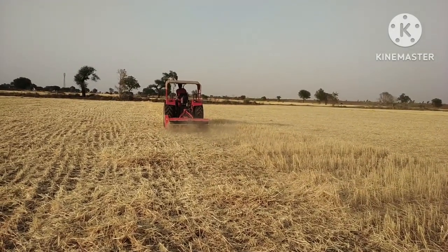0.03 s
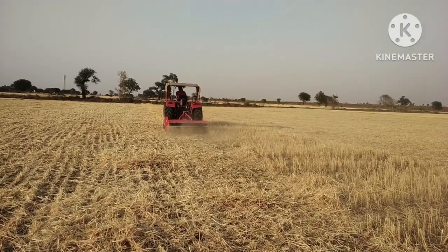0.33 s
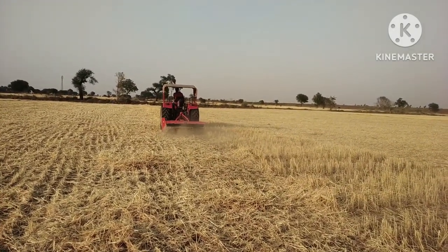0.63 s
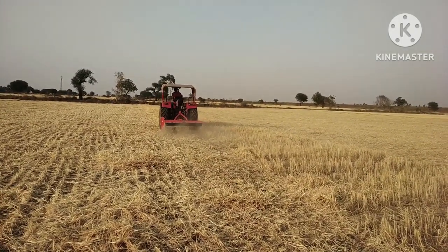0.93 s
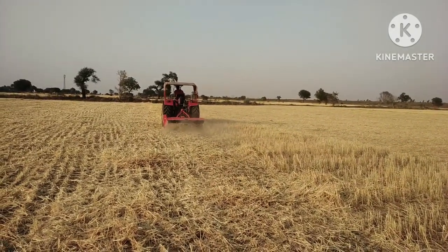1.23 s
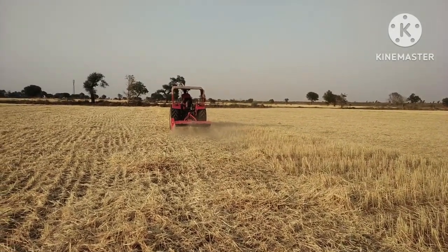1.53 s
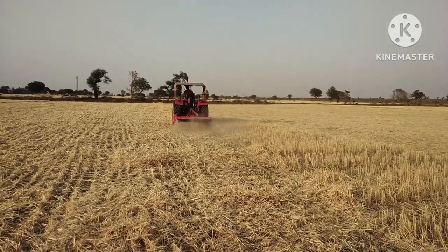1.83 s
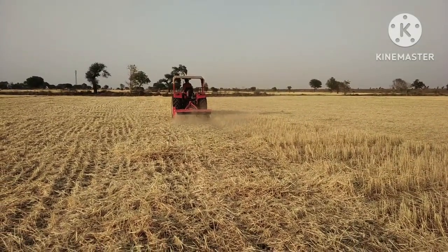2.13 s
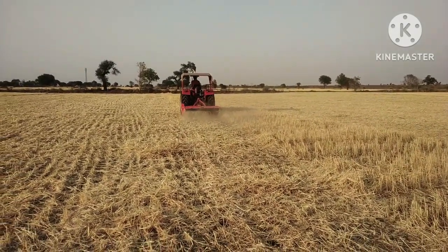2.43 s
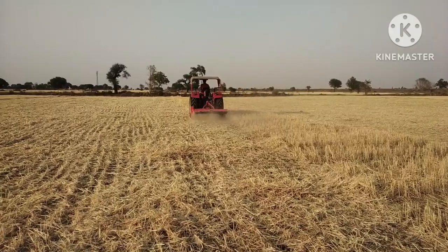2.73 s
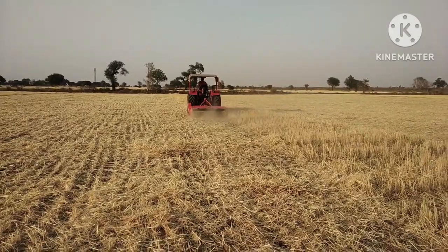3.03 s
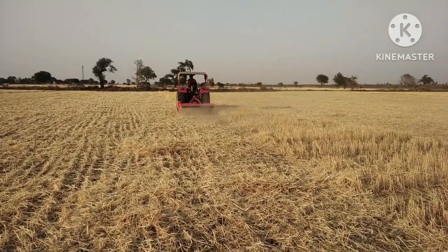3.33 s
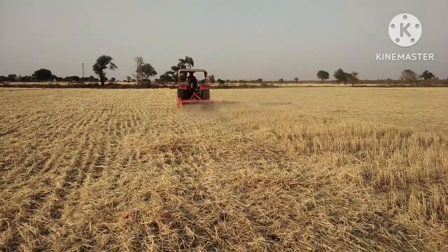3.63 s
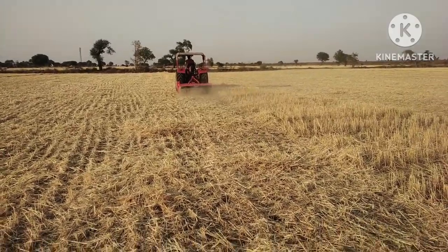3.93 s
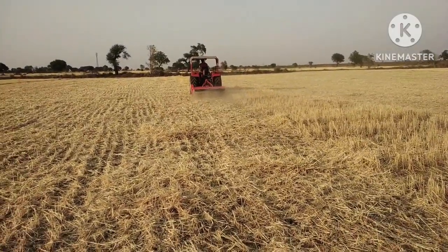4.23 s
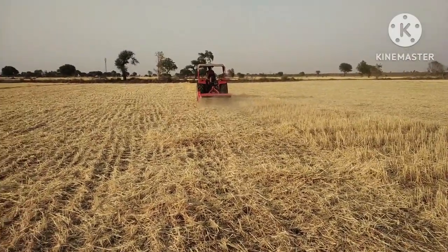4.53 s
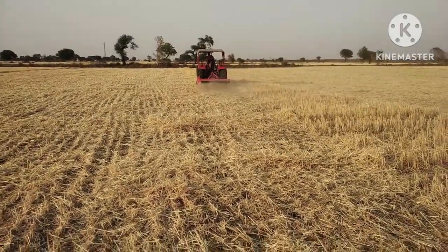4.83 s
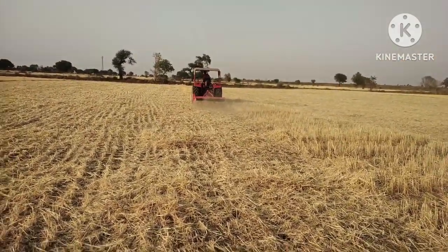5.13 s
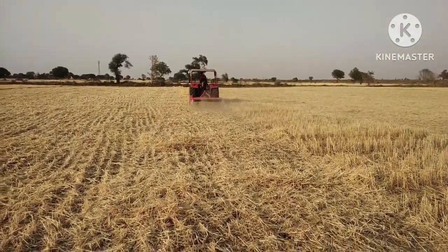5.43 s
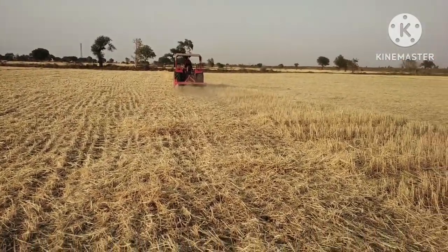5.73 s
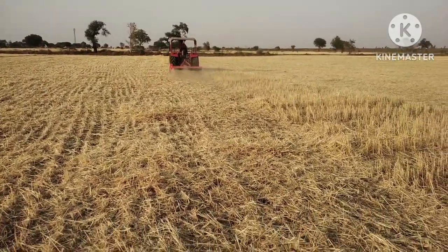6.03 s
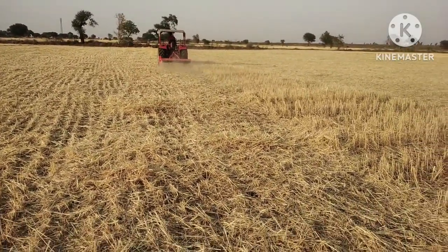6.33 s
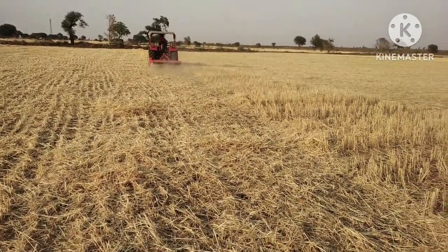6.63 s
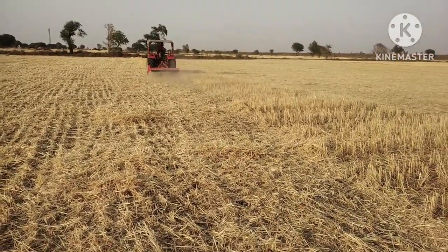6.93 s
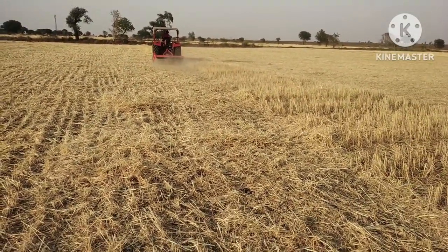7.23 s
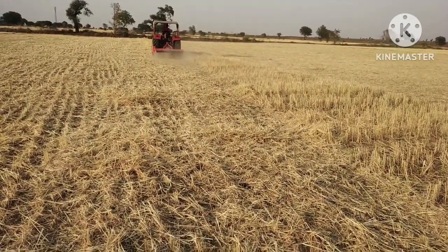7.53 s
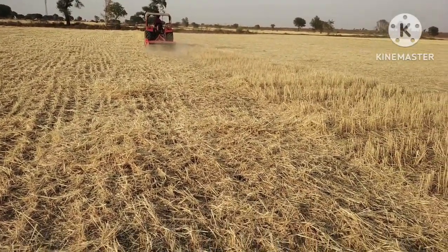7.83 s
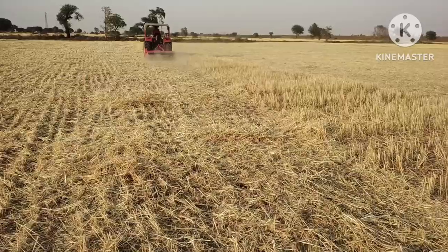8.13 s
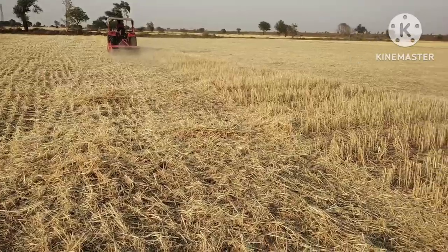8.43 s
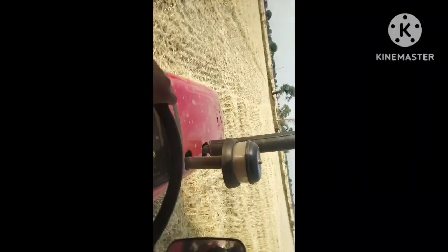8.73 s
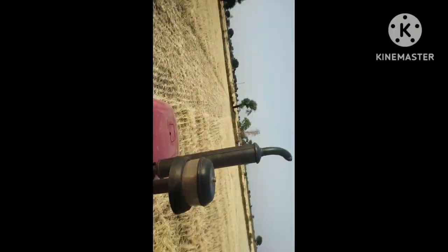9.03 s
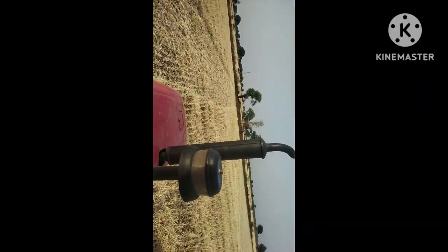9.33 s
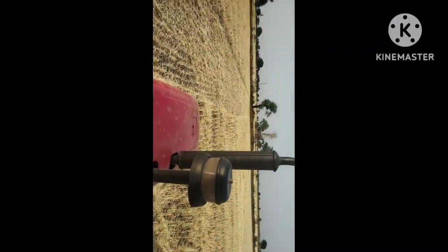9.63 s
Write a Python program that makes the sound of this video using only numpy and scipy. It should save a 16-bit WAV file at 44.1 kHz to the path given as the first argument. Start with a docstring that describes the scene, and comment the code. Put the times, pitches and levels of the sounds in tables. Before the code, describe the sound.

From the start, a diesel tractor pulls a mulcher across an open field, some way off. Flails chop straw in an uneven roar that slowly recedes, over a steady engine rumble and hum. Gears whine in wavering tones that surge now and then. Dry stubble hisses and crackles toward the right, with a thin sizzle of chaff on the left. Stalks snap occasionally, most sharply at 1.8 seconds. Between 4 and 5.3 seconds the machine's tone shifts slightly upward in colour. From about 5.3 to 8.4 seconds, wind bumps and flutters on the microphone, mostly on the left. Everything fades to a brief silence at 8.7 seconds. By 8.9 the sound returns from the driver's seat: a louder, close, low diesel roar with rapid knocking, ringing bonnet panels and thin hiss. The bodywork jolts around 9 seconds and again at 9.7, just before the end.

```python
"""A dry stubble field, where a diesel tractor pulls a mulcher slowly away, some way off.
Flails chop straw into a roar, stubble hisses, chaff sizzles and gears whine, all combed by a ground
echo. Under them the engine rumbles, exhaust and rotor hum, stalks snap and wind bumps the microphone.
The field fades out and the sound comes back from the driver's seat: a close, low diesel roar
with a knock on every firing, ringing bonnet panels and a few jolts."""
import sys
import numpy as np
from scipy import signal
from scipy.fft import rfft, irfft, next_fast_len
from scipy.io import wavfile
from scipy.ndimage import map_coordinates

SR = 44100
rng = np.random.default_rng(int(sys.argv[2]) if len(sys.argv) > 2 else 0)


def generate_wav(sig):
    """Save sig (samples, or channels by samples) to the path in sys.argv[1] as 16-bit PCM at SR."""
    pcm = np.round(np.clip(np.atleast_2d(sig).T, -1, 1) * 32767).astype(np.int16)
    wavfile.write(sys.argv[1], SR, pcm)


N = 431738
TIME = np.arange(N) / SR
FFT_SIZE = next_fast_len(N, True)
SEAT_START_S = 8.75


def gain_of(db):
    """Decibels to gain."""
    return 10 ** (np.asarray(db) / 20)


def unit_rms(x):
    """Scales to rms 1."""
    return x / np.sqrt(np.mean(x ** 2) + 1e-20)


def curve(rows, column=1):
    """One column of a time table as an automation curve, at every sample."""
    rows = np.array(rows, float)
    return np.interp(TIME, rows[:, 0], rows[:, column])


def at_bins(points):
    """A frequency table at every FFT bin."""
    hz, value = np.transpose(points)
    return np.interp(np.log(np.fft.rfftfreq(FFT_SIZE, 1 / SR) + 1), np.log(hz), value)


def equalise(x, eq):
    """Filters by an EQ curve in dB."""
    return irfft(rfft(x, FFT_SIZE) * gain_of(at_bins(eq)), FFT_SIZE)[..., :N]


def drift(rate_hz):
    """Slow random modulation of rms 1, up to about rate_hz."""
    size, hop = 2 ** 13, 64
    hz = np.fft.rfftfreq(size, hop / SR)
    wander = irfft(rfft(rng.standard_normal(size)) / (1 + (hz / rate_hz) ** 2))
    return unit_rms(np.interp(np.arange(N) / hop, np.arange(size), wander))


def pan(pan_db):
    """Left and right gains; pan_db is left minus right."""
    return unit_rms(gain_of(np.array([[pan_db], [-pan_db]]) / 2))


def add(mix, start_s, sound):
    """Drops a short stereo sound into the mix."""
    part = mix[:, max(round(start_s * SR), 0):][:, :sound.shape[1]]
    part += sound[:, :part.shape[1]]


def delayed(x, lag_ms):
    """A delay line whose lag follows a curve."""
    return map_coordinates(x, [(TIME - lag_ms / 1000) * SR], order=3, mode="nearest")


# How alike left and right are: freq_hz, field_correlation, seat_correlation
STEREO_IMAGE = [(60, 0.18, 0.89), (300, 0.94, 0.94), (800, 0.89, 0.58), (1600, 0.25, 0.04),
                (4200, 0.99, 0.064), (6300, 0.15, 0.02)]
FIELD, SEAT = 1, 2  # the column for each listening spot
def mic_pair(noises, spot):
    """Blends two unrelated noises into a stereo pair whose width varies with frequency."""
    mid, side = rfft(noises, FFT_SIZE)
    correlation = np.clip(at_bins([(row[0], row[spot]) for row in STEREO_IMAGE]), -.99, .99)
    mid, side = mid * np.sqrt(1 + correlation), side * np.sqrt(1 - correlation)
    return irfft(np.array([mid + side, mid - side]), FFT_SIZE)[:, :N]


def distance_gain(start_m=7.06, speed_m_per_s=1.0):
    """The level falls as the tractor drives steadily away."""
    return start_m / (start_m + speed_m_per_s * TIME)


# Engine speed, at two crank turns and four firings a cycle: time_s, cycle_hz
ENGINE_SPEED = [(0, 12.39), (8.7, 12.39), (8.8, 12.94), (9.79, 12.94)]
def engine_cycles():
    """The running count of engine cycles, with a slight waver in speed."""
    return np.cumsum(curve(ENGINE_SPEED) * (1 + 0.001504 * drift(1.533))) / SR


def clatter(cycles, loop_share, throb, spot=FIELD):
    """A rattle loops every engine cycle amid fresh noise, swelling with each firing and crank turn."""
    size = round(SR / ENGINE_SPEED[0][1])
    one_cycle = rng.standard_normal((2, size))
    loop = np.array([np.interp(cycles % 1 * size, np.arange(size), side) for side in one_cycle])
    fresh = rng.standard_normal((2, N))
    rattle = np.sqrt(loop_share) * unit_rms(loop) + np.sqrt(1 - loop_share) * fresh
    pulse = np.cos(8 * np.pi * cycles) + np.cos(4 * np.pi * cycles) / 2
    return mic_pair(rattle * (1 + throb * pulse), spot)


# Exhaust partials, then rotor partials: cycle_multiple, field_level_db, seat_level_db
EXHAUST_PARTIALS = [(8.07, -59, -39), (12.12, -52.5, -29.5), (14.92, -53, -54), (20.4, -51.5, -32),
                    (23.65, -77, -33.5), (23.77, -53, -49), (26.4, -55, -45), (29.88, -57.5, -32.5),
                    (32.7, -59, -35.5), (37.77, -58, -37), (45.9, -55, -34.5), (48.8, -55, -54),
                    (61.1, -67, -36), (64.7, -56.5, -58)]
ROTOR_PARTIALS = [(8.91, -57, -50), (17.81, -42, -27.5)]
def exhaust_and_rotor_hum(cycles, spot, waver_db=1.0, smear_rad=0):
    """Wavering tones locked to the engine; rough running smears the higher ones."""
    hum = np.zeros(N)
    for partial in EXHAUST_PARTIALS + ROTOR_PARTIALS:
        multiple = partial[0]
        level = gain_of(partial[spot] + waver_db * drift(2.5))
        phase = 2 * np.pi * (multiple * cycles + rng.random())
        hum += level * np.sqrt(2) * np.sin(phase + smear_rad * multiple ** 2 * drift(9))
    return hum


# The engine's low end across the field: freq_hz, gain_db
RUMBLE_EQ = [(25, -46), (55, -26), (85, -16.5), (120, -8.5), (160, -0.5), (210, 8.5), (270, 1),
             (380, -14.5), (700, -19), (2000, -52)]
def engine_rumble(cycles, level_db=-39):
    """The low rumble carries over the field, falling off more gently than the chopping."""
    body = unit_rms(equalise(clatter(cycles, loop_share=0.18, throb=0.21), RUMBLE_EQ))
    return pan(-.3) * body * gain_of(level_db + 1.46 * drift(5.9)) * distance_gain() ** 0.14


def flail_tremolo(cycles, depth):
    """Four rows of flails sweep the straw in each rotor turn, one harder than the rest."""
    sweep = 2 * np.pi * ROTOR_PARTIALS[0][0] * cycles
    return 1 + depth * (np.cos(sweep) + np.cos(sweep / 4))


# Level ride as thick and thin straw goes through the flails; the level also dips briefly and deeply at 5.32 s:
# time_s, level_db
STRAW_FEED = [(0.0, -37.5), (0.14, -40), (0.38, -35), (0.73, -37.5), (1.87, -34), (1.96, -37), (2.32, -34),
              (2.39, -38.5), (2.79, -39.5), (2.84, -36), (3.29, -41), (3.6, -37), (3.91, -40), (4.43, -38),
              (4.45, -40.5), (4.85, -35), (5.09, -40.5), (5.28, -38), (5.32, -47.5), (5.51, -36),
              (6.08, -41), (7.6, -43.5), (7.65, -39), (8.1, -45), (8.21, -40.5), (8.5, -38)]
# The bright tone of dry stubble: freq_hz, gain_db
STRAW_EQ = [(1000, -15.5), (3500, -2.5), (5200, 4), (6200, 2.5), (7400, 1), (9000, 1), (12000, 2),
            (15500, 2.5)]
def straw_hiss(cycles, grain=0.22, crackles_per_s=250, decay_s=0.0057, trim_db=5.0):
    """Dry stubble hisses and crackles under the flails, mostly on the right."""
    ticks = (rng.random((2, N)) < crackles_per_s / SR) * rng.standard_normal((2, N))
    ticks *= gain_of(7.3 * np.minimum(rng.exponential(1, (2, N)), 4))  # a few stand far out
    crackle = signal.lfilter([1], [1, -np.exp(-1 / (decay_s * SR))], abs(ticks))
    hiss = mic_pair(rng.standard_normal((2, N)), FIELD) * (1 + grain * unit_rms(crackle))
    hiss = unit_rms(equalise(hiss * flail_tremolo(cycles, depth=0.011), STRAW_EQ))
    return pan(-9.5) * hiss * gain_of(curve(STRAW_FEED) + trim_db + drift(14))


# The chopping roar's tone, and the EQ added by the far end of the run: freq_hz, gain_db
CHOP_EQ = [(40, -58), (100, -23), (220, -7.5), (350, 0.5), (500, 3), (650, 0), (800, 1.5), (1050, -2),
           (1500, -3), (2000, -3.5), (2300, -4.5), (3000, -5.5), (3900, -4.5), (4650, -15), (5300, -28.5),
           (9000, -16.5)]
FAR_EQ = [(250, 10), (480, -1), (800, 4.5), (1600, 0.5), (2300, 3), (3100, 2.5), (4500, -2.5)]
# The band of its metallic rasp: freq_hz, gain_db
RASP_EQ = [(1500, -32), (2150, 5), (2800, 1), (3600, -24)]
# Level ride on that band: time_s, gain_db
RASP_RIDE = [(0, 1), (2, 0.5), (3, -0.5), (4.5, -1.5), (5.5, 1.5), (6.5, 1.5), (8.5, 1)]
def chopping_roar(cycles, level_db=-30.5, crop_follow=0.25):
    """Flails chop straw in an uneven roar that follows the crop and changes colour with distance."""
    near = unit_rms(equalise(clatter(cycles, loop_share=0.069, throb=0.031), CHOP_EQ))
    chop = near + (equalise(near, FAR_EQ) - near) * TIME / SEAT_START_S
    chop += equalise(chop, RASP_EQ) * (gain_of(curve(RASP_RIDE)) - 1)
    crop_db = curve(STRAW_FEED) - curve(STRAW_FEED).mean()
    level = gain_of(level_db + crop_follow * crop_db + 1.27 * drift(20)) * distance_gain()
    return pan(-2.2) * chop * flail_tremolo(cycles, depth=0.025) * level


# The band of flying chaff, riding on the straw feed: time_s, centre_hz, offset_db
CHAFF_BAND = [(0, 7460, -11.5), (2, 7580, -14.5), (2.7, 7200, -8.5), (3.3, 8140, -8.5), (4, 8030, -15),
              (5.8, 8400, -14), (6.5, 8350, -31)]
def chaff_sizzle(half_width_hz=600, waver_hz=220):
    """Chaff spraying from the hood adds a bright, wavering band, mostly on the left."""
    lowpass = signal.butter(2, half_width_hz, fs=SR, output="sos")
    noise = signal.sosfilt(lowpass, rng.standard_normal(N) + 1j * rng.standard_normal(N))
    carrier = np.exp(2j * np.pi * np.cumsum(curve(CHAFF_BAND) + waver_hz * drift(4.5)) / SR)
    level_db = curve(STRAW_FEED) + curve(CHAFF_BAND, column=2) + 4.4 * drift(14) + 2.9 * drift(70)
    return pan(24) * unit_rms((noise * carrier).real) * gain_of(level_db)


# Gear partials: cycle_multiple, width_hz, offset_db, mesh (0 first, 1 second)
GEAR_PARTIALS = [(88.5, 9.3, -3.5, 0), (89.8, 24, -8, 0), (90.7, 110, -14, 0), (103.44, 4.5, 1.5, 1),
                 (103, 34, -6.5, 1), (117.3, 12, -11.5, 0), (130.2, 21, -9.5, 0)]
# Level ride on the first mesh, ahead of the distance falloff: time_s, level_db
FIRST_MESH_RIDE = [(0, -39.5), (3.3, -37.5), (4.1, -36.5), (6.3, -34), (7, -35.5), (8.5, -32.5)]
# Heavier loads make the second mesh sing out: centre_s, length_s, boost_db
LOAD_SURGES = [(0.642, 0.31, 12), (1.35, 0.43, 6.5), (2.7, 0.29, 6), (4.05, 1, 7.5), (5.084, 0.54, 7.5),
               (5.928, 0.21, 7), (6.7, .22, 2), (7.237, 0.42, 11), (7.914, .3, 5)]
def gear_whine(cycles, second_mesh_db=-47.5, fuzz=0.42, wander_rad=0.85):
    """Two loaded gear meshes sing in wandering tones with sidebands; the second rings out in surges."""
    surge_db = sum(boost_db * np.exp(-(2 * (TIME - centre_s) / length_s) ** 4)
                   for centre_s, length_s, boost_db in LOAD_SURGES)
    mesh_gains = [pan(-0.5) * gain_of(curve(FIRST_MESH_RIDE)),
                  pan(-12.0) * gain_of(second_mesh_db + surge_db)]
    whine = np.zeros((2, N))
    for multiple, width_hz, offset_db, mesh in GEAR_PARTIALS:
        phase = 2 * np.pi * (multiple * cycles + rng.random()) + wander_rad * drift(width_hz)
        sidebands = fuzz * (drift(2 * width_hz) + 1j * drift(2 * width_hz))
        tone = (np.exp(1j * phase) * (1 + sidebands)).real
        whine += mesh_gains[round(mesh)] * gain_of(offset_db) * unit_rms(tone)
    return whine * distance_gain()


# Three ground paths as the microphone is carried along: time_s, path1_ms, path2_ms, path3_ms
GROUND_LAGS = [(0, 2.01, 2.404, 2.279), (2, 1.93, 2.397, 2.274), (3, 1.9, 2.374, 2.244),
               (4, 1.87, 2.3, 2.232), (4.6, 1.77, 2.198, 2.017), (5.25, 1.55, 1.957, 1.755),
               (6.3, 1.41, 1.916, 1.745), (7, 1.26, 1.864, 1.726), (8.1, 1.29, 1.839, 1.66),
               (8.7, 1.15, 1.6, 1.65)]
# Echo taps on those paths, with gains before and after the main move (side 0 is left, 1 right):
# to_side, from_side, path, extra_ms, gain_before, gain_after, centre_hz
GROUND_TAPS = [(0, 0, 1, .013, .18, .3, 2230), (0, 0, 1, -.44, -.22, .06, 880),
               (0, 0, 2, .005, -.38, -.5, 900), (0, 0, 2, -.18, .3, .4, 9900),
               (0, 1, 2, .07, -.5, -.46, 1700), (0, 1, 2, -.11, .32, .3, 2000),
               (1, 0, 2, .05, -.33, -.33, 1900), (1, 1, 3, -.011, .25, .4, 2400),
               (1, 1, 3, -.05, .25, .25, 800), (1, 1, 3, .483, -.2, -.3, 615)]
# The left side hears the tractor later than the right: time_s, lag_ms
LEFT_LAG = [(0, .055), (2, .05), (4.5, .04), (5.3, .045), (6.2, .075), (8.7, .09)]
def ground_echo(direct, move_start_s=4, move_end_s=5.3, half_width_octaves=1.6):
    """Ground reflections comb the sound; as their lags shrink, the combs sweep upward."""
    spectra = rfft(direct, FFT_SIZE)
    hz = np.fft.rfftfreq(FFT_SIZE, 1 / SR) + 1
    moved = np.clip((TIME - move_start_s) / (move_end_s - move_start_s), 0, 1)
    combed = direct.copy()
    for to_side, from_side, path, extra_ms, before, after, centre_hz in GROUND_TAPS:
        bell = np.exp(-(np.log2(hz / centre_hz) / half_width_octaves) ** 2)
        band = irfft(spectra[from_side] * bell, FFT_SIZE)[:N]
        echo = delayed(band, curve(GROUND_LAGS, column=path) + extra_ms)
        combed[to_side] += (before + (after - before) * moved) * echo
    return np.array([delayed(combed[0], curve(LEFT_LAG)), combed[1]])


def cracks(cues, trim_db=-4.0):
    """A decaying burst of band noise for each cue: a short crack or a longer crunch."""
    mix, age_s = np.zeros((2, N)), np.arange(SR // 10) / SR
    for start_s, level_db, centre_hz, decay_s, pan_db in cues:
        edges_hz = [centre_hz / 3, min(centre_hz * 2, SR / 3)]
        bandpass = signal.butter(4, edges_hz, "band", fs=SR, output="sos")
        noise = rng.standard_normal(len(age_s)) + .5 * rng.standard_normal((2, len(age_s)))
        crack = unit_rms(signal.sosfilt(bandpass, noise)) * np.exp(-age_s / decay_s)
        add(mix, start_s, pan(pan_db) * gain_of(level_db + trim_db) * crack)
    return mix


# Breaking stalks: start_s, level_db, centre_hz, decay_s, pan_db
STALK_SNAPS = [(.5, -21, 1500, .006, 3), (1.465, -23.5, 1800, 0.01, 3), (1.8128, -11, 1300, 0.0032, 0),
               (1.852, -23, 4000, 0.0034, -3), (3.03, -28, 2200, .008, 0), (3.052, -20.5, 650, 0.01, 9),
               (4.804, -27, 2500, .005, 0), (4.841, -24, 2500, .004, 0), (4.912, -27, 2500, 0.012, -2),
               (7.761, -22, 1710, 0.0039, 0)]
def stalk_snaps():
    """Single dry stalks snap and crunch."""
    return cracks(STALK_SNAPS)


# The low thud of wind on the microphone: freq_hz, gain_db
WIND_EQ = [(30, -46), (70, -27), (130, -15.5), (190, 4), (270, 0), (400, -12), (700, -29), (2000, -68)]
# Eddies hitting it: time_s, level_db, pan_db
WIND_EDDIES = [(5.291, -20.5, -29), (5.374, -19, 22), (5.602, -21, 13), (5.68, -26, 16), (5.729, -19, 22),
               (5.791, -26, 10), (6.759, -20.5, 18), (6.941, -23, 14), (7.122, -15.5, 19), (7.188, -21, 23),
               (7.359, -25, 18), (7.575, -22, -13), (7.659, -13.5, 28), (7.779, -22, 26), (7.927, -20, 25),
               (8.157, -23, 25), (8.384, -21.5, 27), (9.011, -27, 4), (9.721, -10, -1)]
def wind_bumps(rise_s=0.01, lead_s=.004, trim_db=-6.0, low_cut_hz=100):
    """Each eddy is a short low bump of noise, heavier on one side."""
    mix = np.zeros((2, N))
    air = signal.hilbert(equalise(rng.standard_normal(N), WIND_EQ), next_fast_len(N))[:N]
    air = unit_rms(air.real / np.sqrt(abs(air) + 1e-9))  # 2:1 compression
    age = np.arange(SR // 6) / SR / rise_s
    for time_s, level_db, pan_db in WIND_EDDIES:
        eddy = air[:len(age)] * age * np.exp(1 - age)
        air = np.roll(air, -len(age))  # fresh noise for every eddy
        add(mix, time_s - lead_s, pan(pan_db) * gain_of(level_db + trim_db) * eddy)
    return signal.sosfilt(signal.butter(3, low_cut_hz, "high", fs=SR, output="sos"), mix)


# Gusts on the left of the microphone: start_s, end_s, level_db
WIND_GUSTS = [(5.505, 5.892, -36), (6.643, 8.452, -38)]
def wind_gusts(ramp_s=0.048, lumpy_db=3):
    """Between the bumps, a gust keeps up a lumpy low flutter."""
    level = sum(gain_of(level_db) * np.clip(np.minimum(TIME - start_s, end_s - TIME) / ramp_s, 0, 1)
                for start_s, end_s, level_db in WIND_GUSTS)
    flutter = unit_rms(equalise(rng.standard_normal(N), WIND_EQ))
    return pan(42) * flutter * level * gain_of(lumpy_db * drift(16))


# The body of the knock at the seat: freq_hz, gain_db
KNOCK_EQ = [(25, -48), (85, -33), (130, -22), (180, 8.5), (270, 5.5), (400, 2), (1200, -7.5), (2500, -10),
            (5000, -34), (9000, -49)]
def diesel_knock(cycles, level_db=-26, decay_s=0.0091, uneven_db=3):
    """Each firing gives a hard knock, never twice the same strength."""
    since_firing_s = (4 * cycles % 1) / (4 * curve(ENGINE_SPEED))
    envelope = np.exp(-since_firing_s / decay_s) * gain_of(uneven_db * drift(16))
    blows = envelope * mic_pair(rng.standard_normal((2, N)), SEAT)
    return gain_of(level_db) * unit_rms(equalise(blows, KNOCK_EQ))


# Bonnet resonances: pitch_hz, width_hz, level_db
PANEL_MODES = [(1350, 21, -35.5), (1954, 11, -42)]
def panel_ring():
    """Bonnet panels near the seat ring in narrow, fluttering tones."""
    return sum(gain_of(level_db) * drift(width_hz) * np.sin(2 * np.pi * pitch_hz * TIME)
               for pitch_hz, width_hz, level_db in PANEL_MODES)


# The close engine roar, and the thin hiss above it: freq_hz, gain_db
SEAT_ROAR_EQ = [(25, -46), (85, -41), (130, -24), (180, -3), (245, 1.5), (300, -4), (360, -10.5),
                (480, -8.5), (660, -15.5), (800, -8.5), (1200, -12.5), (2100, -18), (3200, -23.5),
                (5000, -33.5), (9000, -65)]
SEAT_HISS_EQ = [(2000, -1), (5000, -1.5), (8000, -2.5), (12000, -1), (15500, 2)]
def engine_at_seat(cycles, roar_db=-21.3, hiss_db=-32.5, settled_at_s=9.06, settle_s=0.02):
    """Close to the exhaust stack: hard, lumpy diesel clatter, ringing panels and a thin hiss."""
    opening = np.clip((settled_at_s - TIME) / settle_s, 0, 1)  # louder and brighter at first
    roar = unit_rms(equalise(clatter(cycles, loop_share=0.28, throb=0.047, spot=SEAT), SEAT_ROAR_EQ))
    roar *= gain_of(roar_db + 2.5 * opening + 0.32 * drift(25))
    hiss = unit_rms(equalise(rng.standard_normal((2, N)), SEAT_HISS_EQ))
    hiss *= gain_of(hiss_db + 5 * opening + 2.1 * drift(18))
    panels = panel_ring()
    rough_cycles = cycles + 0.0024 * drift(3.5)  # the crank speeds up and slows down
    hum_gain = gain_of(-3.5 + 1.3 * drift(17))
    hum = hum_gain * exhaust_and_rotor_hum(rough_cycles, SEAT, smear_rad=.0009)
    return pan(1.1) * (roar + panels + hum + diesel_knock(cycles)) + hiss


# Hits on the bodywork: start_s, level_db, centre_hz, decay_s, pan_db
BODY_JOLTS = [(8.926, -27, 1470, 0.0098, 0), (9.015, -18.5, 1120, 0.014, 5), (9.719, -10, 500, .004, 0)]
def body_jolts():
    """Jolts rattle the bodywork near the seat."""
    return cracks(BODY_JOLTS)


def scene():
    """One crankshaft drives the machine, heard first from the field and then from the seat."""
    cycles = engine_cycles()
    mulcher = chopping_roar(cycles) + gear_whine(cycles) + straw_hiss(cycles) + chaff_sizzle()
    field = ground_echo(mulcher) + engine_rumble(cycles)
    field += exhaust_and_rotor_hum(cycles, FIELD) + stalk_snaps()
    seat = engine_at_seat(cycles) + body_jolts()
    return np.where(TIME < SEAT_START_S, field, seat) + wind_bumps() + wind_gusts()


# Master fader, down to silence between field and seat: time_s, gain
MASTER_FADE = [(8.3, 1), (8.55, .85), (8.7, .25), (8.71, 0), (8.78, 0), (8.83, .04), (8.87, .28),
               (8.922, .42), (8.927, 1)]
def record(dry):
    """Fades out of the field and into the seat, then cuts the very top of the treble."""
    high_cut = signal.firwin(511, cutoff=15750, window=("kaiser", 9), fs=SR)
    return signal.oaconvolve(dry * curve(MASTER_FADE), high_cut[None], "same")


dry = scene()
out = record(dry)
generate_wav(out)
```